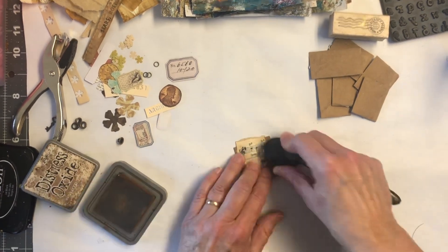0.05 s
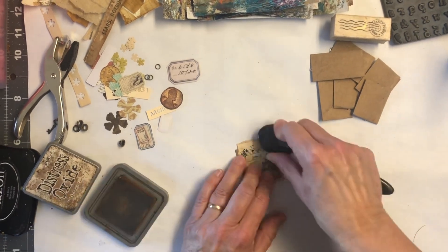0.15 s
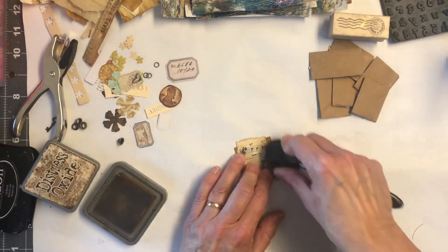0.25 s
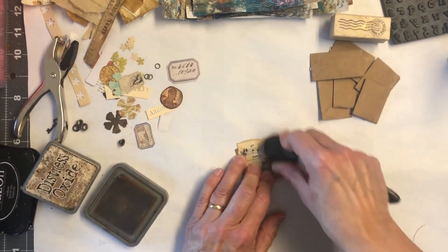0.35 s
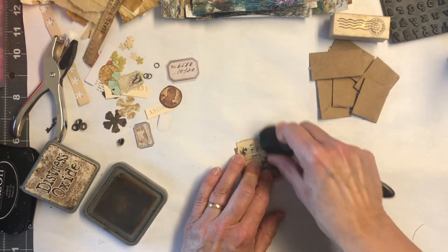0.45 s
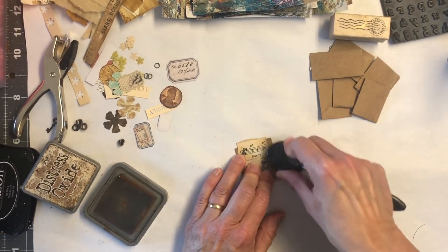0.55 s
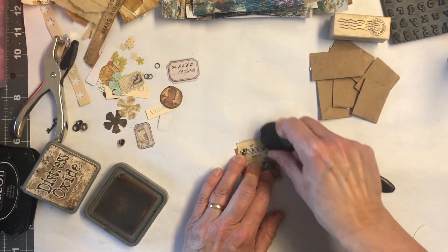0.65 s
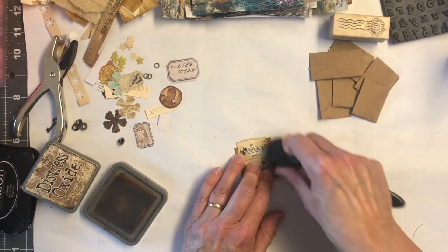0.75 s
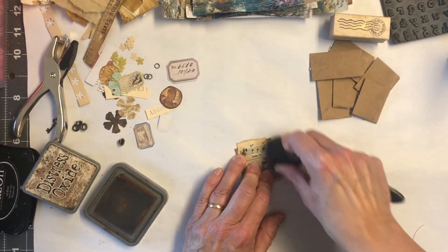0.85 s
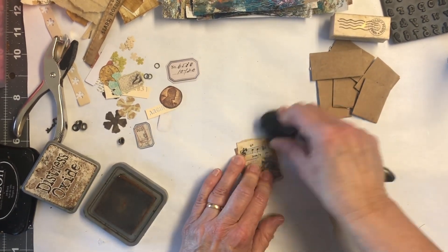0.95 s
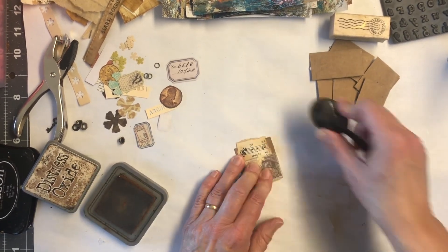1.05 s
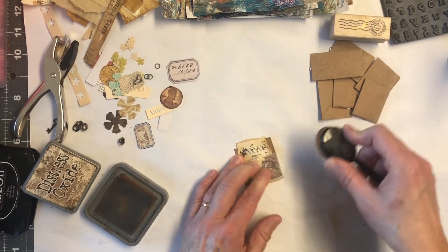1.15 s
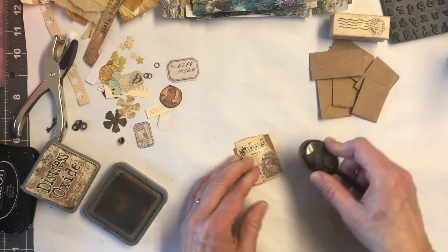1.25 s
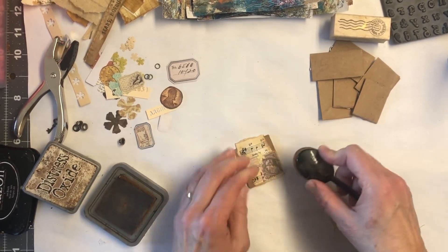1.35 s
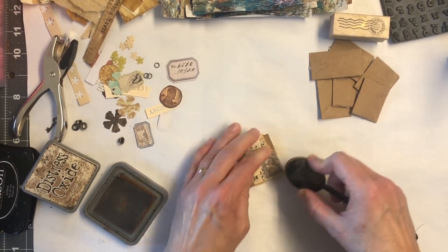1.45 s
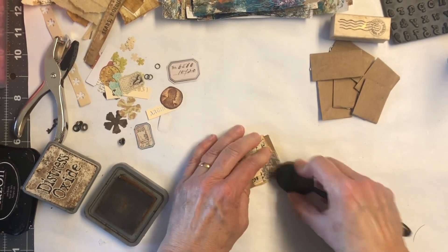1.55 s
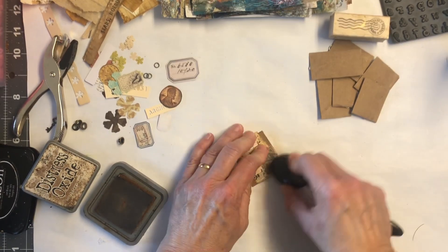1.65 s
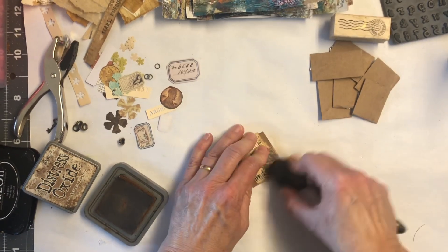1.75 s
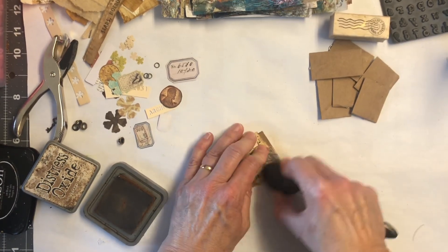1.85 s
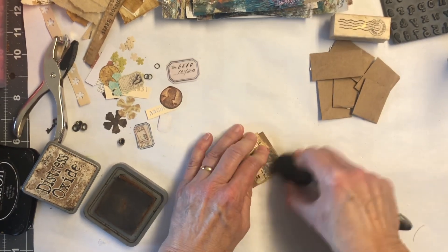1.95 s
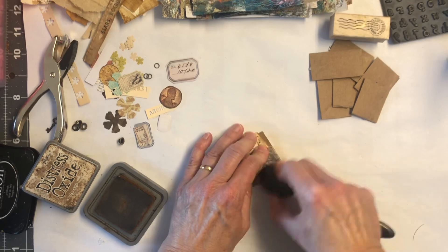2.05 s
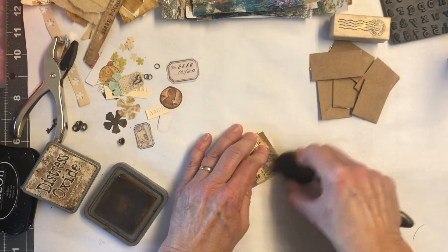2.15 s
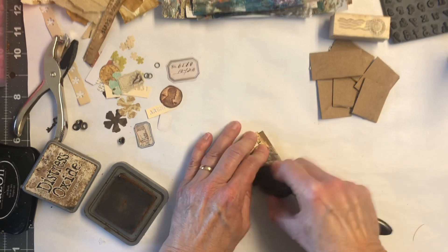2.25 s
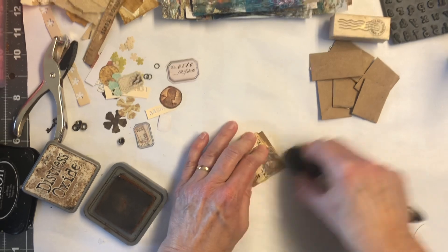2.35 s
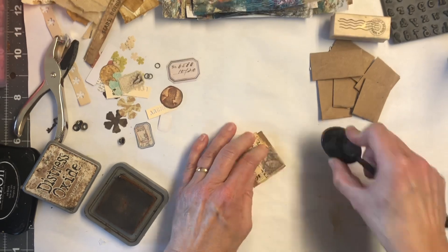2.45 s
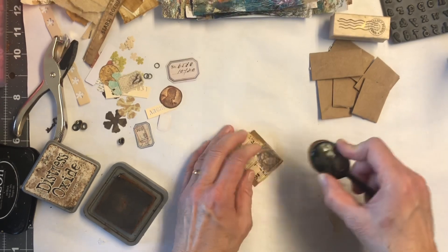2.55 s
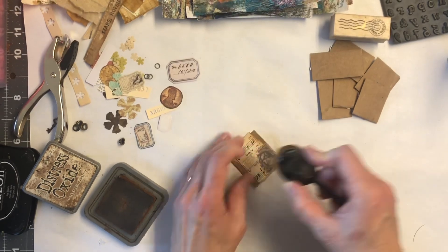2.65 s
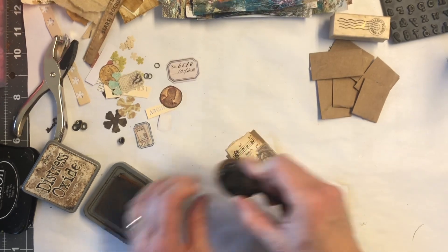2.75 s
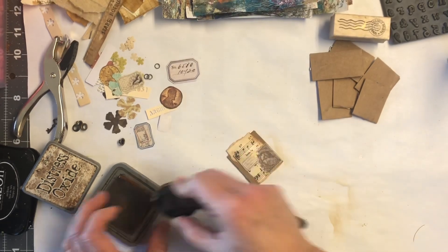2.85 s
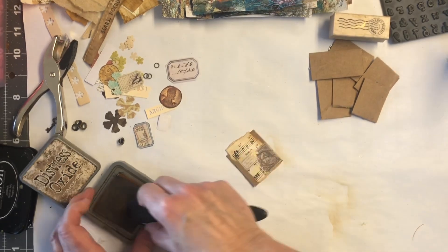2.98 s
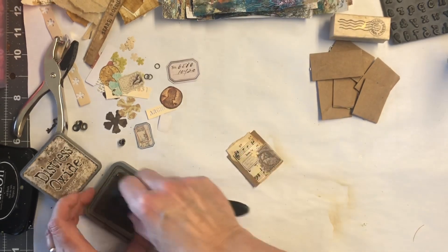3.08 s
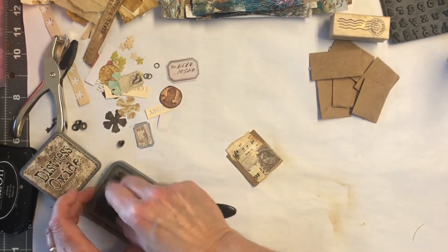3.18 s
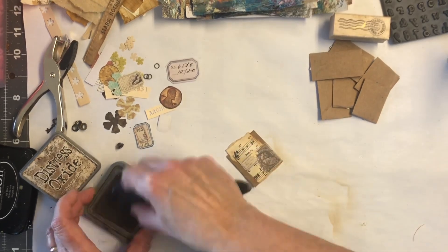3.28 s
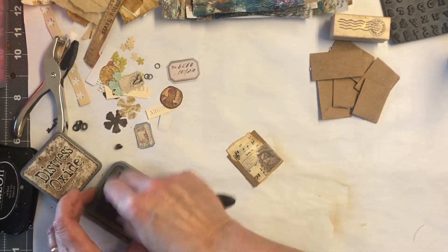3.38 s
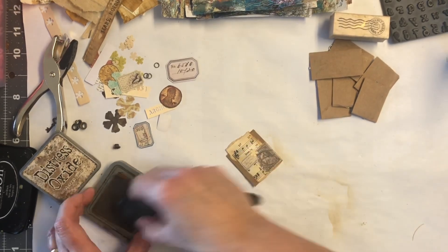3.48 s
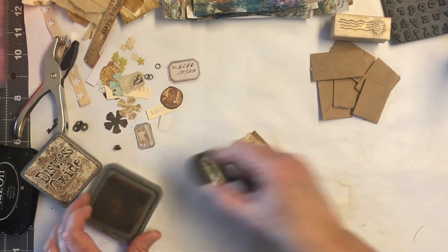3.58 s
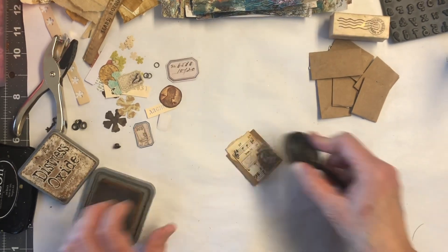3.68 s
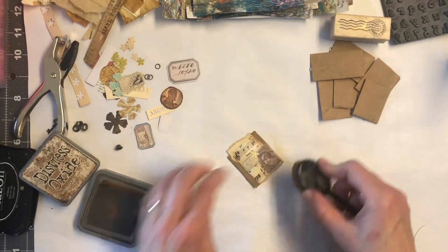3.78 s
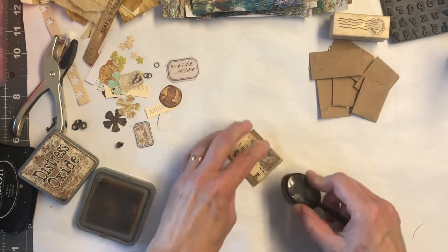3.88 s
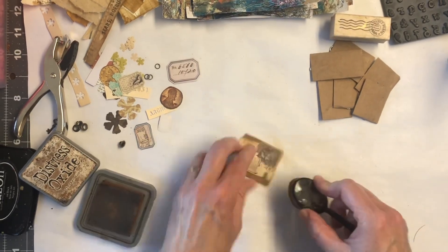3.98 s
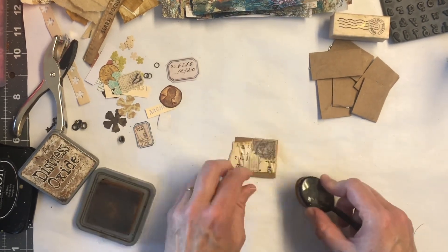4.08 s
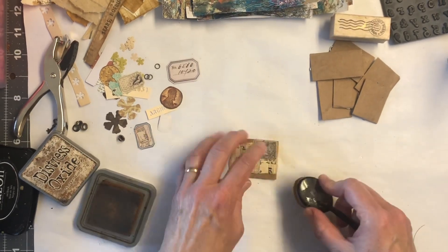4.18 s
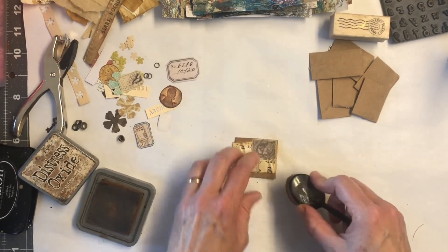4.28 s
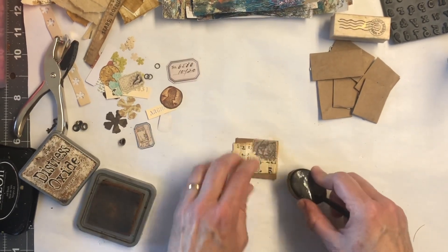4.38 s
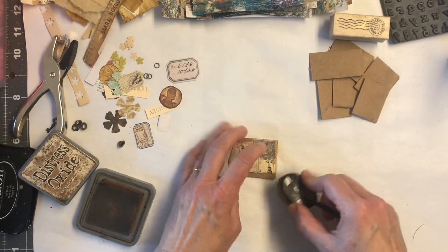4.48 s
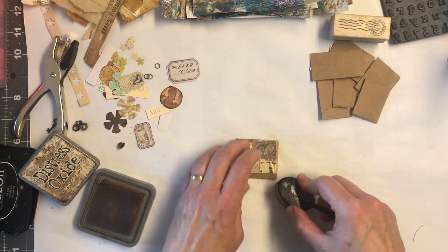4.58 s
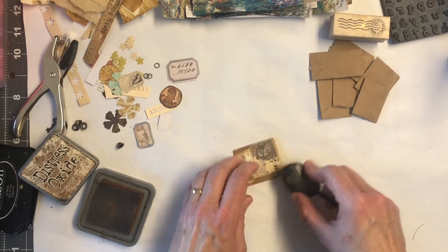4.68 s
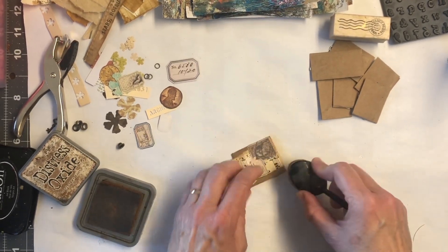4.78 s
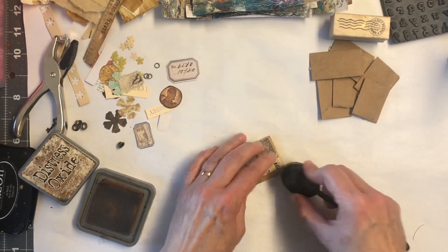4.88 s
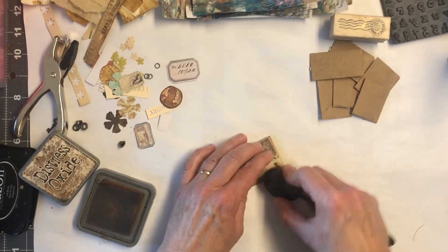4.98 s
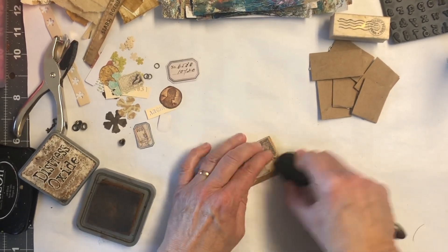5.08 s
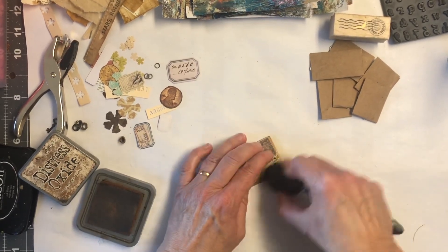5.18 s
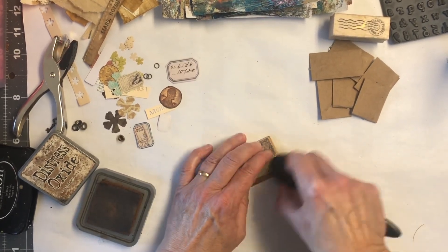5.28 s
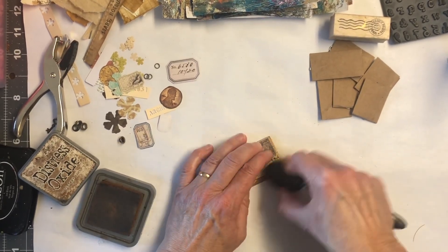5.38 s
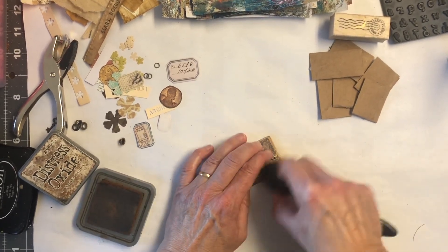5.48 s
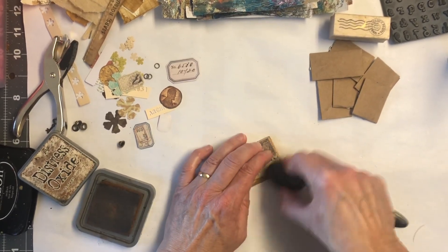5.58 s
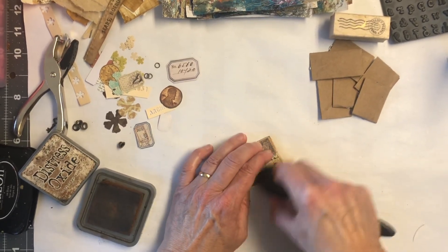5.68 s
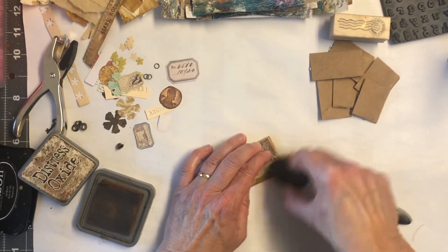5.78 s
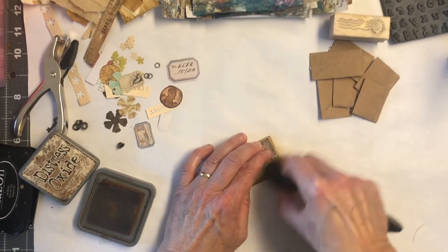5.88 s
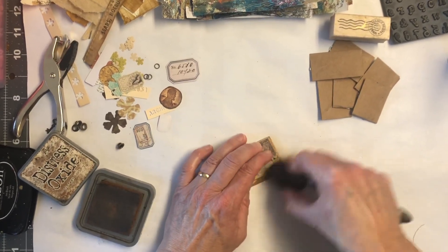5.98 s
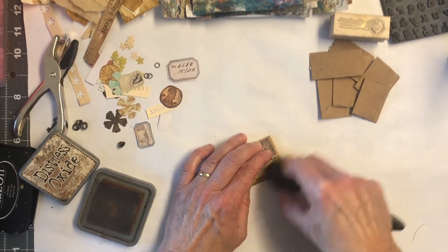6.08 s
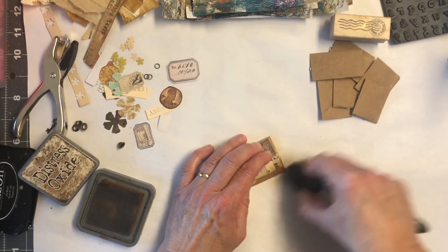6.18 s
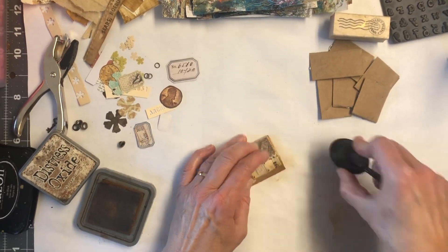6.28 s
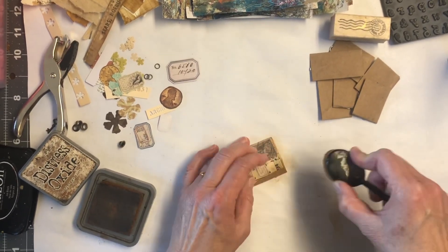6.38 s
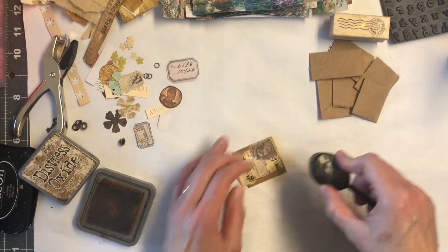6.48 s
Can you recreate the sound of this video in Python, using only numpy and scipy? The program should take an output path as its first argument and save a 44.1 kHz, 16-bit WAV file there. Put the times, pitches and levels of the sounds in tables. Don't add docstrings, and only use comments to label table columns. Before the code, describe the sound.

Close up in a small quiet room, a foam blending tool hisses to and fro over a paper scrap. Firm strokes give way to lighter ones, then sharp taps and quicker side-edge rubbing. The tool clacks on a hollow ink pad and dabs it, the paper scrapes softly round on the table, and the hardest, crackliest rubbing follows. Low table drumming lies beneath.

```python
import sys
import numpy as np
from scipy import signal
from scipy.fft import rfft, irfft, next_fast_len
from scipy.io import wavfile
from scipy.ndimage import uniform_filter1d

SR = 44100
rng = np.random.default_rng(int(sys.argv[2]) if len(sys.argv) > 2 else 0)


def volts_from_decibels(level):
    exponent = np.asarray(level, float) / 20
    return 10 ** exponent


def to_wav(sig):
    pcm = np.clip(np.atleast_2d(sig), -1, 1) * 32767
    pcm = np.round(pcm).astype(np.int16)
    wavfile.write(sys.argv[1], SR, pcm.T)


N = 287973

# peak_s, low_drumming_db, upper_drumming_db
PUSHES = [(0.026, -47, -47.5), (0.249, -69, -54.5), (0.38, -61, -61), (0.632, -51.5, -65),
          (1.562, -56.5, -56.5), (1.85, -54, -59.5), (1.96, -49, -67), (2.163, -57, -57),
          (2.35, -50, -51.5), (2.579, -61.5, -64), (3.011, -57, -52.5), (3.292, -57, -54),
          (3.453, -62, -60), (3.669, -55, -59), (3.93, -64, -63), (4.239, -54, -55), (4.932, -47, -55.5),
          (5.06, -57, -55), (5.6, -54, -52), (5.782, -54.5, -55), (6.02, -51.5, -52), (6.201, -58.5, -61)]


def unit(x):
    return x / np.sqrt(np.mean(x ** 2) + 1e-20)


def drift(rate_hz):
    r = np.exp(-40 * np.pi * rate_hz / SR)
    slow = signal.lfilter([1], [1, -2 * r, r * r], rng.standard_normal(N // 20 + 2002))[2000:]
    return np.interp(np.arange(N) / 20, np.arange(len(slow)), unit(slow))


def ring(clicks, hz, t60):
    r = volts_from_decibels(-60 / (t60 * SR))
    turn = 2 * np.pi * hz / SR
    return signal.lfilter([0, np.sin(turn)], [1, -2 * r * np.cos(turn), r * r], clicks + 1e-18)


def band(x, low_hz, high_hz):
    limits = [low_hz, min(high_hz, .45 * SR)]
    return signal.sosfilt(signal.butter(2, limits, "band", fs=SR, output="sos"), x)


def burst(noise, t60):
    shape = noise * volts_from_decibels(-60 * np.arange(len(noise)) / SR / t60)
    return shape / np.abs(shape).max()


def colour(x, spectrum):
    size = next_fast_len(len(x))
    hz = np.fft.rfftfreq(size, 1 / SR) + 1
    points = np.array(spectrum)
    shape_db = np.interp(np.log(hz), np.log(points[:, 0]), points[:, 1])
    bass_cut = np.minimum(hz / points[0, 0], 1) ** 2
    return unit(irfft(rfft(x, size) * volts_from_decibels(shape_db) * bass_cut, size)[:len(x)])


def grains(per_s, spread_db):
    size = volts_from_decibels(spread_db * np.minimum(rng.exponential(1, N), 5)) * rng.choice([-1, 1], N)
    return size * (rng.random(N) < per_s / SR)


def spells():
    # touch_s, rise_s (a duration), lift_s, touch_pressure_db, lift_pressure_db
    top = [
        (.047, 0.15, 0.18, -24.5, -48.5),
        (.19, 0.05, .3, -41.5, -42.5),
        (.319, 0.066, 0.43, -38, -45),
        (.437, 0.06, 0.55, -45.5, -39),
        (.572, 0.062, 0.6795, -41, -42.5),
        (.69, 0.049, 0.81, -44, -42.5),
        (.826, 0.084, 1.027, -27.5, -65),
    ]
    side = [
        (1.556, 0.011, 1.653, -53.5, -46.5),
        (1.659, 0.036, 1.734, -43.5, -53.5),
        (1.757, 0.02, 1.822, -40, -48.5),
        (1.81, 0.056, 1.917, -44, -57.5),
        (1.931, 0.042, 2.005, -33.5, -50.5),
        (1.999, 0.027, 2.1, -48.5, -49.5),
        (2.111, 0.04, 2.2, -40, -46.5),
        (2.197, .017, 2.303, -52, -47),
        (2.303, 0.084, 2.425, -27.5, -53.5),
    ]
    corner = [(4.96, 0.018, 5.009, -45, -45.5), (5.029, 0.014, 5.097, -42.5, -43),
              (5.075, 0.042, 5.186, -53, -40.5), (5.198, 0.018, 5.262, -47.5, -37),
              (5.258, 0.071, 5.365, -45, -38), (5.384, 0.024, 5.464, -39.5, -50.5),
              (5.465, 0.062, 5.572, -27, -56.5), (5.574, 0.018, 5.655, -37.5, -50.5),
              (5.662, 0.034, 5.76, -37.5, -48), (5.768, 0.0186, 5.862, -36, -48.5),
              (5.846, 0.11, 5.97, -26.5, -50.5), (5.984, 0.013, 6.057, -41, -37),
              (6.044, 0.052, 6.155, -49, -42.5), (6.126, 0.054, 6.257, -42.5, -46)]
    inking = [
        (2.921, 0.03, 3.018, -51.5, -59.5),
        (3.06, 0.036, 3.17, -50.5, -61),
        (3.205, 0.022, 3.26, -46.5, -58.5),
        (3.272, 0.02, 3.357, -47, -53),
        (3.368, 0.033, 3.51, -45.5, -60.5),
        (3.53, 0.035, 3.662, -60.5, -58),
    ]
    slides = [
        (3.924, 0.011, 4.072, -50.5, -50.5),
        (4.211, 0.027, 4.348, -47.5, -55),
        (4.447, 0.0061, 4.545, -46.5, -58.5),
        (4.536, 0.027, 4.62, -55, -56.5),
        (4.606, 0.085, 4.762, -38, -62),
    ]
    fades = [
        0.017,
        0.0234,
        0.038,
        0.035,
        0.031,
    ]
    return [[(touch, rise, lift, fade, first_db, last_db) for touch, rise, lift, first_db, last_db in rows]
            for rows, fade in zip((top, side, corner, inking, slides), fades)]


def pressure(strokes):
    t, out = np.arange(N) / SR, np.zeros(N)
    for touch, rise, lift, fall, first_db, last_db in strokes:
        a, b = max(int(touch * SR), 0), min(int(lift * SR), N)
        swell = np.sin(np.pi / 2 * np.clip((t[a:b] - touch) / rise, 0, 1)) ** 2
        fade = np.sin(np.pi / 2 * np.clip((lift - t[a:b]) / fall, 0, 1)) ** 2
        out[a:b] += (swell * fade * volts_from_decibels(np.linspace(first_db, last_db, b - a))) ** 2
    return np.sqrt(out)


def friction(strokes, spectrum, per_s, spread_db, catch_db, lift_db):
    slips, press = colour(grains(per_s, spread_db), spectrum), pressure(strokes)
    dull = signal.sosfilt(signal.butter(2, 3000, fs=SR, output="sos"), slips)
    fine = signal.sosfilt(signal.butter(2, 8000, "high", fs=SR, output="sos"), slips)
    together = drift(40)
    dull_gain = volts_from_decibels(catch_db * (0.33 * together + 0.18 * drift(27)))
    fine_loss = 1 - (press / press.max()) ** .15 * volts_from_decibels(1.2 * drift(10))
    bright = (slips - dull - fine_loss * fine) * volts_from_decibels(catch_db * together)
    return press * volts_from_decibels(lift_db) * (dull * dull_gain + bright)


def foam_on_paper(top, side, corner):
    # pitch_hz, level_db (per Hz)
    top_colour = [(500, -9), (850, -11), (1500, -11), (3000, -7), (3900, 1), (5800, 0), (9000, -8),
                  (16000, -12.5)]
    side_colour = [(500, -9), (850, -7.5), (2000, -6.5), (4100, 1.5), (5500, 0.5), (8000, -4.5),
                   (12000, -5), (16000, -5)]
    corner_colour = [(500, -9), (850, -9.5), (1500, -7), (2400, -2), (5000, 3), (8000, -1.5), (12000, -2.5),
                     (16000, -3.5)]
    out = friction(top, top_colour, per_s=14000, spread_db=2.5, catch_db=.7, lift_db=-.6)
    out += friction(side, side_colour, per_s=26000, spread_db=3.0, catch_db=2.0, lift_db=1.2)
    return out + friction(corner, corner_colour, per_s=11000, spread_db=2.9, catch_db=1.1, lift_db=-.6)


def snaps():
    # start_s, peak_db, centre_hz, brightness_db
    edge_snaps = [(.021, -33.5, 2760, -4), (0.03, -46, 2470, -6), (0.194, -31, 4400, -2),
                  (0.23, -30, 4430, -2), (.351, -34, 4820, -10), (.454, -34, 4200, 4), (.686, -36, 3910, 0),
                  (1.563, -33.5, 3500, -6.5), (2.096, -38, 3500, 2), (5.042, -26, 3540, 4),
                  (5.24, -24.5, 2720, 7), (5.244, -25.5, 6200, 1), (5.286, -22.5, 11600, 5.5),
                  (5.334, -33, 4180, 4), (5.443, -30, 2480, 2), (5.454, -30.5, 4870, 13),
                  (5.509, -27.5, 2560, 12), (5.553, -30, 5500, -1), (5.634, -31, 4800, 11),
                  (5.704, -24.5, 2530, 12), (5.78, -34, 5570, -5), (5.817, -32, 5110, -10),
                  (6.03, -28, 4500, -4), (6.116, -31.5, 2460, 6), (6.216, -31.5, 3550, 12)]
    taps = [(0.981, -21.5, 6740, 8.5), (1.281, -28.5, 2220, 4), (1.3972, -16.5, 4360, 0.5),
            (1.3995, -20.5, 4350, -2), (1.5054, -28, 4080, 13.5), (1.51, -24.5, 4200, -6.5),
            (2.522, -39.5, 4170, 13), (2.557, -31.5, 3460, 4), (2.565, -25.5, 3080, 4),
            (3.928, -34, 4050, 5), (3.942, -33.5, 3870, 1), (4.452, -39, 8720, -4),
            (4.456, -32.5, 6400, -4), (4.74, -35, 2280, -4), (4.916, -35, 5000, 3),
            (4.9223, -24.5, 4000, 16.5), (6.262, -26.5, 7140, 16.5), (6.307, -37.5, 3880, -10)]
    ticks = [(1.111, -48, 1190, 10), (1.14, -51, 6210, 7), (1.159, -43.5, 4300, 10), (1.255, -53, 1400, 8),
             (2.758, -44, 11900, 4), (2.801, -47, 7500, -2), (2.822, -57, 4500, 4), (3.492, -38, 1430, -3),
             (3.831, -50.5, 4020, 2.5), (3.915, -48, 9230, 2), (4.061, -47, 1390, -0.5),
             (4.13, -53.5, 8150, 8), (4.215, -46, 5520, 0), (4.504, -47.5, 1270, -3),
             (4.841, -55.5, 2250, 10), (6.292, -58, 2380, 8), (6.345, -51, 6200, 3), (6.392, -49, 4150, 13),
             (6.444, -44, 8400, 7)]
    # dull_db, sharp_db, rattle_db
    kinds = [
        (-21, -12.5, -34),
        (-21.5, -20, -32),
        (-11.5, -9.5, -33.5),
    ]
    span = 8000
    out = np.zeros(N + span)
    events = sorted((*row, *kind) for rows, kind in zip((edge_snaps, taps, ticks), kinds) for row in rows)
    chance = rng.standard_normal((len(events), 2, span))
    chance[:, 0, 0] = 8
    for (s, peak_db, hz, bright_db, dull_db, sharp_db, rattle_db), (jolt, shake) in zip(events, chance):
        dull_db, sharp_db = dull_db - bright_db, sharp_db + bright_db
        rattle_db = rattle_db - 0.31 * peak_db
        kick = burst(jolt, 0.0074 + 0.26 * volts_from_decibels(peak_db))
        tick = burst(band(kick, hz / 1.34, hz * 1.44), 1.0)
        pat = volts_from_decibels(dull_db + 7.0) * burst(band(burst(jolt, 0.037), 520, 1900), 1.0)
        crack = volts_from_decibels(sharp_db + 10.5) * burst(band(kick, 3050, 16300), 1.0)
        rattle = volts_from_decibels(rattle_db + 14.0) * burst(band(shake, hz / 2.8, hz * 2.2), 0.043)
        at = int((s + .0004) * SR)
        out[at:at + span] += volts_from_decibels(peak_db - 4.0) * (tick + pat + crack + rattle)
    return out[:N]


def catches():
    # start_s, length_s, level_db (rms), pitch_hz
    moments = [(1.165, 0.077, -67, 4500), (1.281, .04, -62, 3680), (1.41, .04, -60, 4500),
               (2.602, 0.064, -67.5, 3800), (3.551, .07, -59, 2850), (3.63, .035, -54, 3300),
               (3.674, 0.028, -50, 1580), (3.702, .065, -60, 1550), (3.687, .07, -67, 3300),
               (5.047, 0.029, -48.5, 3270), (5.116, .04, -54, 2520), (5.21, .03, -48, 4600),
               (5.284, .007, -49, 2670), (5.3, .05, -53, 4350), (5.325, 0.036, -53, 2520),
               (5.397, 0.018, -54, 2400), (5.4, .04, -49, 5600), (5.484, .025, -48, 5550),
               (5.52, .03, -54, 1300), (5.584, .006, -46, 2520), (5.588, .055, -45, 5000),
               (5.589, 0.018, -52.5, 1500), (5.677, .018, -48, 5540), (5.779, .014, -45.5, 2800),
               (5.878, .03, -62, 5200), (5.91, .025, -50, 2400), (5.925, 0.0085, -51.5, 1270),
               (5.991, 0.0063, -47, 2400), (6.03, 0.0056, -41.5, 2120), (6.07, .04, -57, 4900),
               (6.158, 0.05, -53, 3970), (6.198, .005, -51, 4800), (6.263, .005, -48, 3460),
               (6.306, .02, -61, 796)]
    span, width, grit_db = 5000, 1.12, 4
    out, t = np.zeros(N + span), np.arange(span) / SR
    for (s, length, db, hz), (slips, sizes) in zip(moments, rng.standard_normal((len(moments), 2, span))):
        part = np.clip(t / length, 0, 1)
        rasp = unit(band(slips * volts_from_decibels(grit_db * sizes), hz / width, hz * width))
        out[int(s * SR):int(s * SR) + span] += volts_from_decibels(db) * np.sin(np.pi * np.sqrt(part)) * rasp
    return out[:N]


def foam_on_pad(inking):
    # pitch_hz, level_db (per Hz)
    pad_colour = [(500, 4.5), (900, -8.5), (1400, -2), (2700, -1.5), (3300, -1), (5000, 1), (9000, -8),
                  (16000, -8.5)]
    return friction(inking, pad_colour, per_s=12000, spread_db=2.5, catch_db=.8, lift_db=-.6)


def pad_case(inking):
    # start_s, peak_db, hardness (0-1), hollow_body_db, rattle_db
    knocks = [(2.9152, -39.5, 0.05, 3.5, -14.5), (2.928, -44, 0, -5, -21), (2.94, -43, 0, 5, -18),
              (2.959, -39, 0, 2, -23), (2.966, -25, 0.31, 0, -24), (2.983, -44, 0, 5, -24),
              (3.0251, -12.5, 0.63, -9.5, -23), (3.055, -28, 0.6, -14.5, -18),
              (3.203, -22.5, 0.52, -15, -24.5), (3.565, -42.5, 0.7, -9, -13), (3.592, -43, 0.6, -21, -29),
              (3.617, -40, 0.3, -15, -34), (3.624, -28, 0.8, -20, -19), (3.6626, -32.5, 1, -19, -33),
              (3.667, -29, 0, -16, -17.5)]
    # pitch_hz, level_db, t60_s
    tones = [(804, -7.5, 0.079), (870, -9.5, .06), (907, -1, 0.099), (965, -1, 0.091), (1020, -6, .07),
             (1750, -5.5, .03), (3580, -10, .08), (5580, -16.5, .04)]
    # pitch_hz, level_db (per Hz)
    clack_colour = [(700, 4.5), (1700, -0.5), (2600, 3), (3600, -4), (4500, 2.5), (5700, -6), (7500, -6),
                    (16000, -11.5)]
    span = 12000
    out = np.zeros(N + span)
    chance = rng.standard_normal((len(knocks), 2, span))
    for (s, peak_db, hard, body_db, rattle_db), (jolt, shake) in zip(knocks, chance):
        top_hz = 2200 * 8.3 ** hard
        clack = burst(band(colour(jolt, clack_colour), 920, top_hz), 0.028)
        rattle = volts_from_decibels(rattle_db + 2.0) * burst(band(colour(shake, clack_colour), 510, top_hz), 0.4)
        out[int(s * SR):int(s * SR) + span] += volts_from_decibels(peak_db) * (clack + rattle)
    at, peak_db, hard, body_db, rattle_db = np.transpose(knocks)
    strength_db = 1.5 * rng.standard_normal((len(knocks), len(tones)))
    stir = pressure(inking) * rng.standard_normal(N) * volts_from_decibels(-51.5)
    for k, (hz, level_db, t60) in enumerate(tones):
        clicks = stir * volts_from_decibels(level_db)
        clicks[(at * SR).astype(int) + 40] += volts_from_decibels(peak_db + body_db + level_db - 8 + strength_db[:, k])
        out[:N] += ring(clicks, hz, t60)
    return signal.sosfilt(signal.butter(4, 790, "high", fs=SR, output="sos"), out[:N])


def strikes():
    # start_s, peak_db, pitch_hz, t60_s
    hits = [(.056, -40, 260, 0.07), (.0225, -32.5, 270, 0.046), (.025, -32, 135, 0.084),
            (.085, -41.5, 216, 0.07), (1.2815, -34, 2750, 0.0085), (1.3973, -21.5, 3800, 0.01),
            (1.3975, -24, 4400, 0.019), (1.3975, -24, 5950, 0.018), (1.401, -38, 760, 0.025),
            (1.404, -51.5, 240, 0.085), (3.667, -25, 1370, .012), (1.5099, -27.5, 4200, 0.013),
            (1.512, -34, 390, 0.025), (2.967, -50, 3560, 0.35), (2.9665, -19, 1040, 0.016),
            (3.0249, -15, 5900, 0.012), (3.0252, -24, 3540, 0.054), (3.0248, -14.5, 1900, 0.01),
            (3.033, -29.5, 1020, 0.067), (3.2035, -34.5, 3500, 0.033), (3.618, -38, 1500, 0.01),
            (3.6242, -23.5, 1780, 0.017), (3.6244, -24.5, 3400, 0.017), (3.6242, -26, 5100, 0.014),
            (3.6245, -46, 13000, 0.014), (3.628, -31.5, 950, 0.048), (3.661, -52, 11150, .03),
            (3.663, -16, 1180, 0.0066), (3.668, -34.5, 2710, 0.017), (3.674, -43, 203, 0.098),
            (4.918, -41, 920, 0.02), (4.9228, -21.5, 2090, 0.0085), (4.9222, -24, 3800, 0.011),
            (4.9231, -27, 6300, 0.0069), (4.926, -32.5, 4100, 0.02), (4.93, -46, 150, 0.09),
            (5.7038, -26.5, 5800, 0.013), (5.783, -40, 1400, .03), (2.56, -37, 3600, .008),
            (2.572, -44, 2680, .01), (.735, -53.5, 830, 0.29), (.55, -55, 880, 0.11),
            (1.3977, -59, 2375, 0.0028), (4.9228, -40, 2800, 0.013), (4.455, -40.5, 1220, 0.016),
            (5.678, -44, 5460, .02), (5.779, -39, 3330, .015), (3.2039, -29.5, 6000, 0.012)]
    span, rise_cycles = 8000, 0.87
    wander = .55
    out, t = np.zeros(N + span), np.arange(span) / SR
    for (s, peak_db, hz, t60), shake in zip(hits, rng.standard_normal((len(hits), span))):
        phase = 2 * np.pi * hz * t + wander * np.sqrt(hz / SR) * np.cumsum(shake)
        swing = (1 - np.exp(-hz * t / rise_cycles)) * np.sin(phase)
        out[int(s * SR):int(s * SR) + span] += volts_from_decibels(peak_db - 60 * t / t60) * swing
    return out[:N]


def rings():
    # start_s, peak_db, pitch_hz, t60_s
    single_rings = [(.022, -40.5, 840, 0.07), (.53, -31.5, 223, 0.039), (1.2812, -20, 5540, 0.0027),
                    (3.565, -53, 2910, 0.34), (1.282, -40.5, 1470, 0.08), (1.405, -56, 8840, 0.27),
                    (3.385, -59, 1480, 0.24), (1.514, -41.5, 598, 0.11), (3.664, -25.5, 583, 0.031),
                    (3.664, -33.5, 1570, 0.059), (3.63, -51, 3400, 0.12), (4.924, -35, 960, 0.052),
                    (4.926, -51, 9000, 0.061), (5.5104, -26, 2470, 0.012), (5.704, -18.5, 2580, 0.013),
                    (6.171, -46, 1040, 0.13)]
    span = 8000
    out, t = np.zeros(N + span), np.arange(span) / SR
    for (s, peak_db, hz, t60), shake in zip(single_rings, rng.standard_normal((len(single_rings), span))):
        rough = unit(band(shake, hz / 1.2, hz * 1.2))
        tone = .3 * np.sin(2 * np.pi * hz * t) + .6 * rough
        out[int(s * SR):int(s * SR) + span] += volts_from_decibels(peak_db - 60 * t / t60) * (1 - np.exp(-hz * t)) * tone
    return out[:N]


def paper_on_mat(slides):
    # pitch_hz, level_db (per Hz)
    mat_colour = [(500, -13), (1000, -13.5), (1500, -10), (3100, -7), (4300, -2.5), (9000, -5), (16000, -9)]
    return friction(slides, mat_colour, per_s=3900, spread_db=-0.5, catch_db=1.5, lift_db=-2.0)


def paper_rustle(lean):
    # start_s, end_s, rustle_db
    shifting = [
        (-.05, 0.075, -55.5),
        (1.05, 1.327, -75.5),
        (2.442, 2.707, -71.5),
        (2.695, 2.88, -75.5),
        (2.992, 3.728, -69.5),
        (3.787, 4.05, -78),
        (4.466, 4.697, -76),
        (6.224, 6.409, -73),
    ]
    # pitch_hz, level_db (per Hz)
    rustle_colour = [(500, 2.5), (1200, 1.5), (2500, 1), (4500, 1), (8000, -2.5), (16000, -7.5)]
    fade_s, still_db, drag_db = 0.047, -79, -17.5
    shifts = pressure([(s, fade_s, end, fade_s, db, db) for s, end, db in shifting])
    level = volts_from_decibels(still_db) + shifts + volts_from_decibels(drag_db) * lean
    return level * volts_from_decibels(3.0 + 2.0 * drift(30)) * colour(grains(5000, spread_db=2.5), rustle_colour)


def hands(lean):
    rise_s, low_sag_db_per_s, high_sag_db_per_s = 0.049, 143.5, 278
    t = np.arange(N) / SR
    low = volts_from_decibels(-72.5) + volts_from_decibels(-21.5) * lean
    high = volts_from_decibels(-67.5) + volts_from_decibels(-30.5) * lean
    for s, low_db, high_db in PUSHES:
        swell, since = np.clip(1 + (t - s) / rise_s, 0, 1) ** 2, np.maximum(t - s, 0)
        low = np.maximum(low, swell * volts_from_decibels(low_db - low_sag_db_per_s * since))
        high = np.maximum(high, swell * volts_from_decibels(high_db - high_sag_db_per_s * since))
    return 20 * np.log10(low), 20 * np.log10(high)


def drumming(tones, level_db, lumpy_db, follow):
    press = pressure(sum(spells(), [])) + 1e-4
    beat = (press / uniform_filter1d(press, SR // 4)) ** follow
    pushes = rng.standard_normal(N) * volts_from_decibels(lumpy_db * drift(14.0)) * beat
    pushes[(np.array(PUSHES)[:, 0] * SR).astype(int) - SR // 200] += volts_from_decibels(25)
    return volts_from_decibels(level_db) * unit(sum(volts_from_decibels(db) * unit(ring(pushes, hz, 1.68 / width)) for hz, width, db in tones))


def table_top(lean):
    # pitch_hz, width_hz, level_db
    deep_tones = [(59, 17, -3), (75.5, 11, -2), (110, 39, -8.5)]
    upper_tones = [(187, 55, 0.5), (220, 110, -6.5), (362, 180, 0.5)]
    low_db, high_db = hands(lean)
    deep = drumming(deep_tones, low_db, lumpy_db=3.0, follow=0.25)
    return deep + drumming(upper_tones, high_db, lumpy_db=3.5, follow=0.024)


def room(x):
    level_db, t60_s, treble_t60_s = -11.5, 0.25, 0.13
    echo_s, echo_db, first_wall_s = 0.0026, -25.5, 0.0054
    size, t = next_fast_len(N + SR), np.arange(SR // 2) / SR
    noise = rng.standard_normal(len(t)) * np.clip(t / first_wall_s - 1, 0, 1)
    dull = signal.sosfilt(signal.butter(1, 3000, fs=SR, output="sos"), noise)
    tail = dull * volts_from_decibels(-60 * t / t60_s) + (noise - dull) * volts_from_decibels(-60 * t / treble_t60_s)
    response = volts_from_decibels(level_db) * tail / np.sqrt(SR * t60_s / 20)
    response[0] = 1
    response[int(echo_s * SR)] = volts_from_decibels(echo_db)
    return irfft(rfft(x, size) * rfft(response, size), size)[:N]


def room_tone():
    # pitch_hz, level_db (per Hz)
    tone_colour = [(180, -41), (300, -10), (398, -17.5), (502, -28), (814, -17), (2300, -31), (16000, -46)]
    return volts_from_decibels(-75) * colour(rng.standard_normal(N), tone_colour)


def scene():
    top, side, corner, inking, slides = spells()
    lean = uniform_filter1d(pressure(top + side + corner), size=SR // 8)
    near = foam_on_paper(top, side, corner) + foam_on_pad(inking)
    near += paper_on_mat(slides) + paper_rustle(lean)
    near += snaps() + rings() + pad_case(inking)
    table = table_top(lean)
    tone = room_tone()
    near += strikes() + catches()
    return (room(near) + table + tone)[None]


def low_pass(x):
    return signal.sosfilt(signal.butter(12, 17000, fs=SR, output="sos"), x)


def record(dry):
    dry = signal.sosfilt(signal.butter(6, 40, "high", fs=SR, output="sos"), dry)
    dry = signal.sosfilt(signal.ellip(9, .3, 36, 15950, fs=SR, output="sos"), dry)
    return low_pass(dry)


dry = scene()
out = record(dry)
to_wav(out)
```